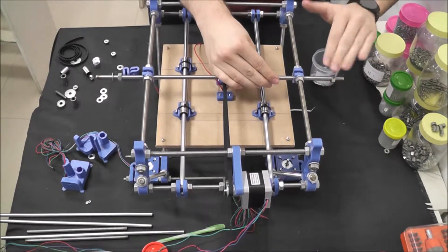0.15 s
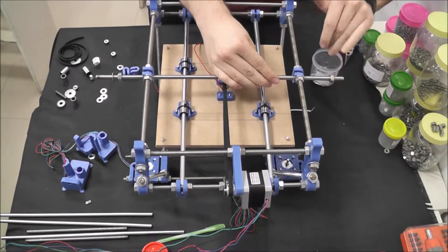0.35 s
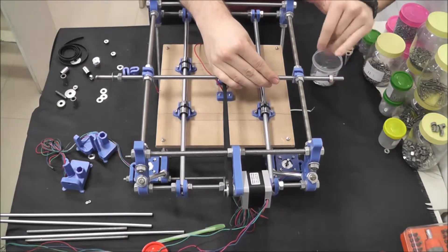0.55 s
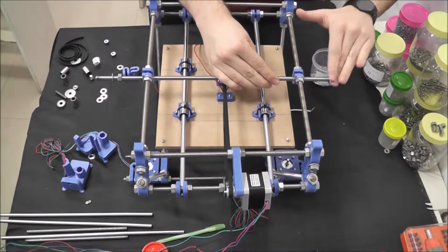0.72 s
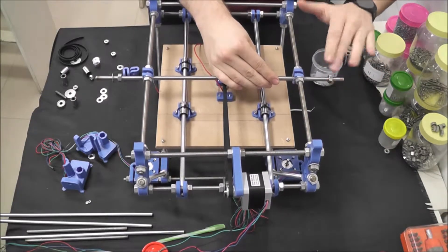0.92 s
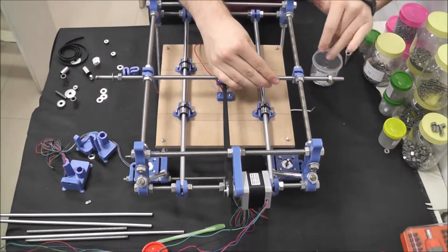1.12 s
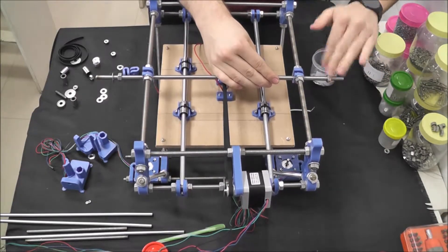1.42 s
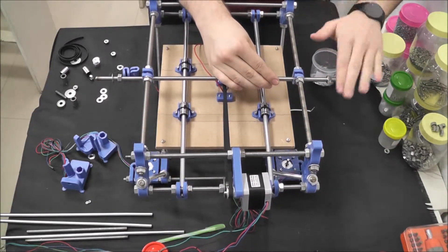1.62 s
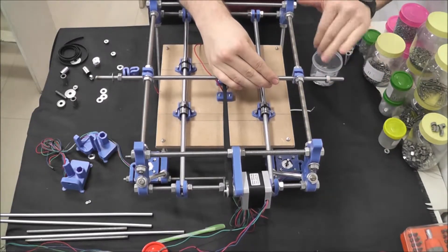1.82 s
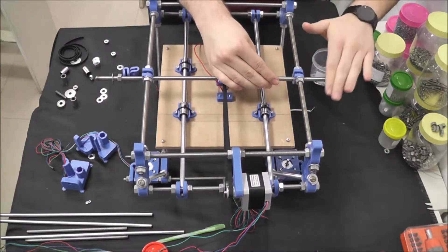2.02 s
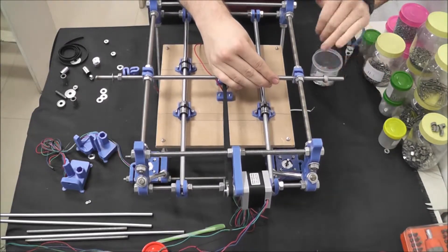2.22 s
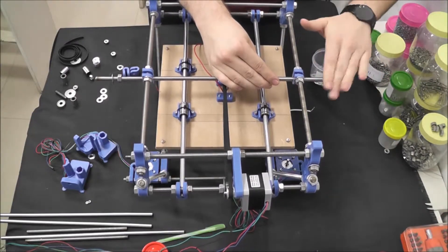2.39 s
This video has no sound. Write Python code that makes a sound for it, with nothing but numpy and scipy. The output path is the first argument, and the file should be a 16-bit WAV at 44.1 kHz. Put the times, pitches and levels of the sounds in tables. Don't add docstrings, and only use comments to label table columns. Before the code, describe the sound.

A metal nut swiped by hand rattles on a steel threaded rod in irregular bright bursts with dull frame and table thuds, then drops to soft knocks and faint thread rubs; small humming room, close microphone.

```python
import sys
import numpy as np
from scipy import signal
from scipy.fft import rfft, irfft
from scipy.io import wavfile
from scipy.ndimage import uniform_filter1d

SR = 44100
rng = np.random.default_rng(int(sys.argv[2]) if len(sys.argv) > 2 else 0)


def to_wav(sig):
    pcm = np.clip(np.atleast_2d(sig), -1, 1) * 32767
    pcm = np.round(pcm).astype(np.int16)
    wavfile.write(sys.argv[1], SR, pcm.T)


def nominal_scale(level):
    x = np.asarray(level, float) / 20
    return 10 ** x


N = 112454
LEAD, SPAN = 8192, 32768

# (frequency [Hz], level [dB per Hz])
HUM_OUTLINE = [(25, -39), (50, -8), (110, -1.5), (450, -8.5), (800, -17.5), (2000, -36), (6000, -39),
               (15000, -48)]
# (frequency [Hz], width [Hz], height [dB])
HUM_HUMPS = [(149, 8.3, 10.5), (300, 8.3, 6), (470, 13.3, 13)]
# (frequency [Hz], level [dB])
HUM_TONES = [(73, -48), (96.5, -49)]
HUM_DB, FLICKER_DB = -42.5, 0.8

# (frequency [Hz], level [dB])
SIDE_OUTLINE = [(60, -15), (200, -15.5), (700, -11), (1300, -10), (2400, -14), (5000, -23), (9000, -17),
                (13500, -4)]
ROOM_T60_S, ROOM_GAP_S = 0.45, 0.0041
ROD_WET_DB, TABLE_WET_DB = -5, -4

# (time [s], level [dB], favoured pitch [Hz], scrape [dB])
THUDS = [(-.074, -14, 294, -9.5), (.098, -17, 166, -6.5), (.183, -16.5, 264, -15), (0.348, -20.5, 164, -8),
         (0.459, -33, 162, -6.5), (.606, -20, 164, -9), (0.663, -10, 418, -12), (.857, -21, 164, -8.5),
         (0.91, -14, 263, -12), (1.116, -20, 165, -3.5), (1.19, -21.5, 183, -15.5),
         (1.289, -32.5, 172, -20), (1.5, -32, 300, -10.5), (1.598, -26, 283, -12), (1.692, -37.5, 164, -17),
         (1.829, -37, 165, -9), (1.905, -34.5, 403, -10), (2.209, -38, 300, -4), (2.281, -35, 300, -3)]
TABLE_HZ = [73, 96, 164, 205, 264, 300, 358, 432, 460, 630, 680, 805, 870, 1050]
# (width [Hz], level [dB])
TABLE_RINGS = [(6.05, -6), (7, 0.5), (22, 2.5), (21.9, 1), (21.2, 0.5), (23.2, -0.5), (23.9, -3), (21.2, 6),
               (23.8, -1), (30.2, -9.5), (29.8, -7.5), (32.6, -6.5), (40.5, -15.5), (59, -17.5)]
# (frequency [Hz], level [dB])
SCRAPE_OUTLINE = [(150, -4), (500, 6), (900, 0), (1300, -4), (1550, -1.5), (1750, -9.5), (1950, -4.5),
                  (2500, -15)]
THUD_DB, FAVOUR_DB, FAVOUR_OCT = 2, 8, 0.25
CONTACT_S, SHAKE, PUSH_S, SCRAPE_S = 0.0011, 0.4, 0.05, 0.011

# (time [s], level [dB], chatter [s], brightness [dB per octave])
JOLTS = [(-.082, -10, 0.0061, -3), (0.094, -29, 0.0067, -12), (0.1008, -13.5, 0.0078, 1.5),
         (0.159, -33, 0.0072, 11), (.177, -15, 0.017, -4.5), (0.3503, -17, 0.0071, -2.5),
         (.601, -31, 0.006, -9), (0.6076, -17.5, 0.013, -3), (0.6264, -32.5, 0.0071, -17),
         (0.6561, -11, 0.017, -1.5), (0.8623, -26, 0.0042, -4.5), (.903, -11.5, 0.014, 0),
         (1.1182, -19, 0.02, -2.5), (1.186, -18, 0.016, -2.5), (1.47, -46, 0.017, 2),
         (1.5005, -36, 0.0017, -3), (1.56, -34, 0.011, -5), (1.577, -29.5, 0.011, -4),
         (1.5873, -21, 0.014, -3.5), (1.619, -56, .006, 2), (1.8512, -47.5, 0.003, -6),
         (1.8913, -35, 0.0027, -3), (1.9297, -32.5, .006, -1), (2.027, -62, 0.0032, -3),
         (2.2, -53.5, 0.013, -8), (2.2364, -36.5, 0.0015, -11), (2.2766, -35, 0.002, -4.5),
         (2.401, -48.5, 0.0041, 15)]
# (time [s], level [dB], length [s])
RUBS = [
    (1.495, -47, .12),
    (1.9, -52, .11),
    (2.234, -46, .09),
]
# (frequency [Hz], width [Hz], level [dB])
RUB_RINGS = [(1480, 60, -5), (2000, 55, 0)]
ROD_HZ = [3650, 4595, 5655, 6920, 7310, 8205, 9690, 10300, 11230, 12850, 13500, 14650]
# (width [Hz], level [dB])
ROD_RINGS = [(200, -25), (86, -9.5), (84, -6.5), (102, -3.5), (112, -18), (111, -6), (137, -3),
             (117, -10.5), (110, -5.5), (163, -10), (152, -16.5), (143, -13.5)]
# (frequency [Hz], level [dB])
ROD_CROWD = [(2000, -39.5), (3500, -29), (5000, -17), (7000, -17), (10000, -20), (14500, -33), (15600, -44),
             (16200, -37)]
JOLT_DB, RISE_S, CHATTER_EDGE = -0.5, 0.0007, 0.7
RATTLE_DB, RATTLE_T60_S, LUMP_DB = -9, 0.32, 2.0
CLICK_SCATTER_DB, MODE_SCATTER_DB = 2.2, 2.2

TOP_HZ = 15800


def outline_gain(outline, hz):
    corner_hz, db = np.array(outline, float).T
    return nominal_scale(np.interp(np.log(hz + 1), np.log(corner_hz), db))


def causal(gain):
    cepstrum = irfft(np.log(gain + 1e-9))
    half = len(cepstrum) // 2
    cepstrum[1:half] *= 2
    cepstrum[half + 1:] = 0
    return np.exp(rfft(cepstrum))


def resonances(rings, extra_db, hz):
    total = 0
    for k, ((f, width, db), extra) in enumerate(zip(rings, extra_db)):
        detune = (hz - f * f / (hz + 1)) / width
        total = total + (-1) ** k * nominal_scale(db + extra) / (1 + 1j * detune)
    return total


def strike(track, time, burst, response, peak_db):
    ring = irfft(rfft(burst) * response, SPAN)
    ring = ring * nominal_scale(peak_db) / np.abs(ring).max()
    start = int(time * SR) + LEAD
    n = min(SPAN, len(track) - start)
    track[start:start + n] += ring[:n]


def hum():
    hz = np.arange(N // 2 + 1) * SR / N
    humps_db = sum(db / (1 + ((hz - f) / width * 2) ** 2) for f, width, db in HUM_HUMPS)
    gain = outline_gain(HUM_OUTLINE, hz) * nominal_scale(humps_db)
    steps = np.repeat(rng.standard_normal(N // 4000 + 1), 4000)[:N]
    slow = uniform_filter1d(steps, size=4000)
    noise = irfft(rfft(rng.standard_normal((2, N))) * gain, N) * nominal_scale(FLICKER_DB * slow)
    turn = 2 * np.pi * np.arange(N) / SR
    drone = 0
    for k, (f, db) in enumerate(HUM_TONES):
        level = nominal_scale(db + 2 * np.roll(slow, 9000 * k))
        wander = np.roll(slow, 30000 + 9000 * k)
        drone = drone + level * np.sin(f * turn + wander)
    return noise * nominal_scale(HUM_DB) / noise[0].std() + drone * np.array([[1], [0.5]])


def room(x, t):
    echoes = rng.standard_normal(SPAN) * nominal_scale(-60 * t / ROOM_T60_S) * (t > ROOM_GAP_S)
    echoes = echoes / np.sqrt(np.sum(echoes ** 2))
    return signal.fftconvolve(x, echoes)[:len(x)]


def table(t, hz):
    out = np.zeros(N + LEAD)
    scrape = causal(outline_gain(SCRAPE_OUTLINE, hz) / (1 + (hz / 5000) ** 8))
    rings = [(f, width, db) for f, (width, db) in zip(TABLE_HZ, TABLE_RINGS)]
    soft = 1 / (1 + 1j * hz * CONTACT_S) ** 2 * (1j * hz / (1j * hz + 70)) ** 2
    for time, db, favour_hz, scrape_db in THUDS:
        lift = [FAVOUR_DB * np.exp(-(np.log2(f / favour_hz) / FAVOUR_OCT) ** 2) for f in TABLE_HZ]
        shaking = SHAKE * rng.standard_normal(SPAN) * np.exp(-t / PUSH_S)
        push = (t == 0) * 30.0 + shaking
        strike(out, time, push, resonances(rings, lift, hz) * soft, db + THUD_DB)
        grit = rng.standard_normal(SPAN) * t ** 2 * np.exp(-t / SCRAPE_S)
        strike(out, time, grit, scrape, db + scrape_db)
    return out


def clicks():
    strength_db = CLICK_SCATTER_DB * rng.exponential(size=SPAN // 16)
    return rng.standard_normal(SPAN) * np.repeat(nominal_scale(strength_db), 16)


def rod_body(rings, crowd, tilt_db, hz):
    scatter_db = MODE_SCATTER_DB * rng.standard_normal(len(rings))
    gain = np.hypot(np.abs(resonances(rings, scatter_db, hz)), crowd)
    octaves = np.log2(np.clip(hz, 2e3, 2e4) / 8e3)
    return causal(gain * nominal_scale(tilt_db * octaves))


def thread_rubs(out, t, hz):
    band = 1j * hz / (1j * hz + 1500) / (1 + 1j * hz / 2000)
    body = resonances(RUB_RINGS, (0, 0), hz) * band
    for time, db, length in RUBS:
        swell = (1 - np.exp(-t / 0.006)) * np.exp(-(t / length) ** 2)
        strike(out, time, clicks() * swell, body, db)


def nut(t, hz):
    out = np.zeros(N + LEAD)
    crowd = outline_gain(ROD_CROWD, hz)
    rings = [(f, width, db) for f, (width, db) in zip(ROD_HZ, ROD_RINGS)]
    for time, db, hold, tilt_db in JOLTS:
        chatter = clicks() * np.exp(-(t / np.clip(hold, 0.002, 0.011)) ** 4)
        chatter = chatter - CHATTER_EDGE * np.roll(chatter, 1)
        lumps = np.repeat(rng.standard_normal(SPAN // 256), 256)
        lumps = uniform_filter1d(lumps, size=128)
        rattle = clicks() * nominal_scale(RATTLE_DB + LUMP_DB * lumps - 60 * t / RATTLE_T60_S)
        burst = (chatter + rattle) * (1 - np.exp(-t / RISE_S))
        strike(out, time, burst, rod_body(rings, crowd, tilt_db, hz), db + JOLT_DB)
    thread_rubs(out, t, hz)
    return out


def scene():
    t = np.arange(SPAN) / SR
    hz = np.arange(SPAN // 2 + 1) * SR / SPAN
    air, wood, rod = hum(), table(t, hz), nut(t, hz)
    send = nominal_scale(ROD_WET_DB) * rod + nominal_scale(TABLE_WET_DB) * wood
    mid = (rod + wood + room(send, t))[LEAD:] + air[0]
    smear = rng.standard_normal(200) / np.sqrt(200)
    rod_side = signal.fftconvolve(rod, smear)[:N + LEAD]
    side = (rod_side + np.roll(wood, 900) + room(send, t))[LEAD:] + air[1]
    side_gain = outline_gain(SIDE_OUTLINE, np.arange(N // 2 + 1) * SR / N)
    side = irfft(rfft(side) * side_gain, N)
    return np.array([0.96 * mid + side, 1.04 * mid - side])


def roll_off(x):
    return signal.sosfilt(signal.butter(12, 16470, fs=SR, output="sos"), x)


def record(dry):
    treble_cut = signal.butter(8, TOP_HZ, fs=SR, output="sos")
    mix = signal.sosfilt(treble_cut, dry)
    return roll_off(mix)


dry = scene()
out = record(dry)
to_wav(out)
```